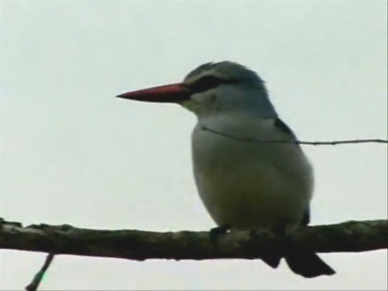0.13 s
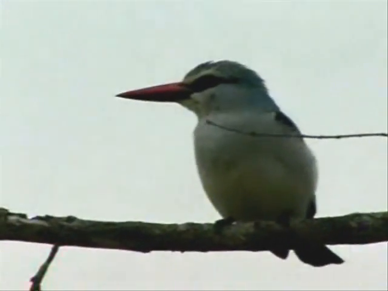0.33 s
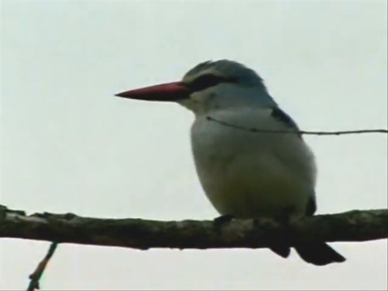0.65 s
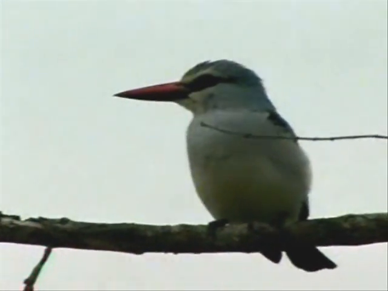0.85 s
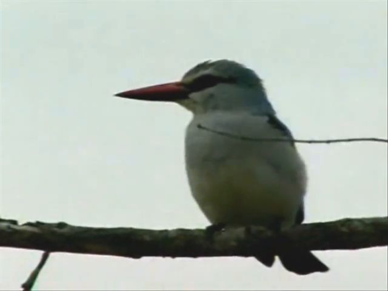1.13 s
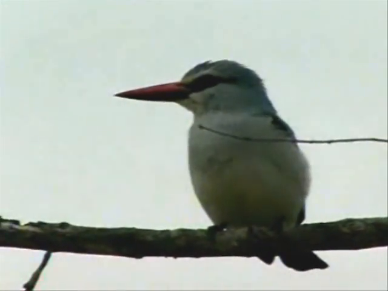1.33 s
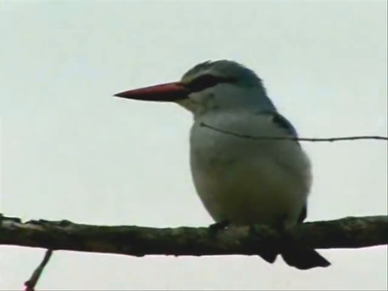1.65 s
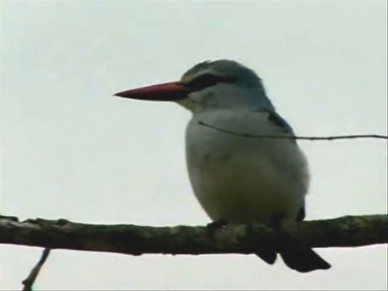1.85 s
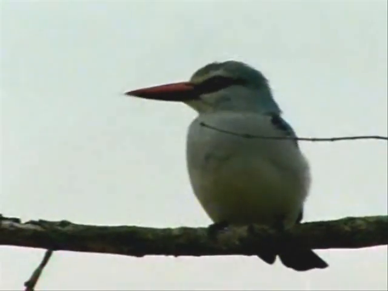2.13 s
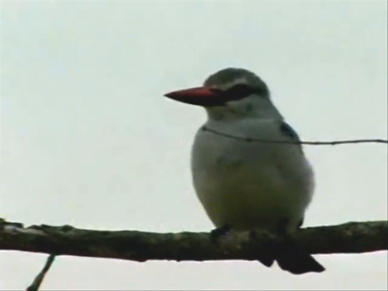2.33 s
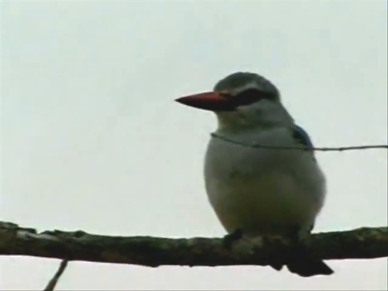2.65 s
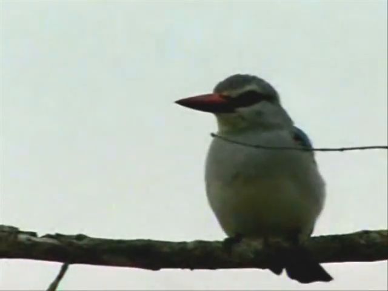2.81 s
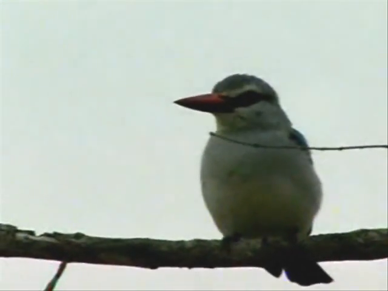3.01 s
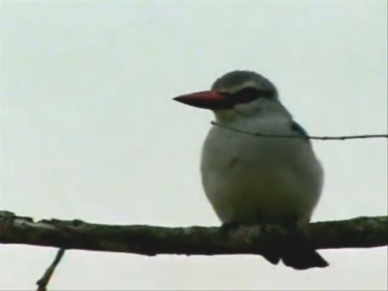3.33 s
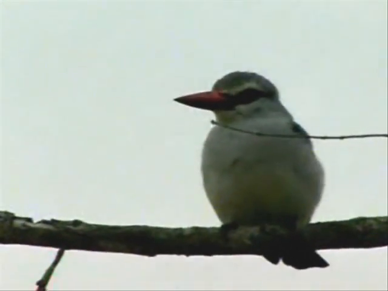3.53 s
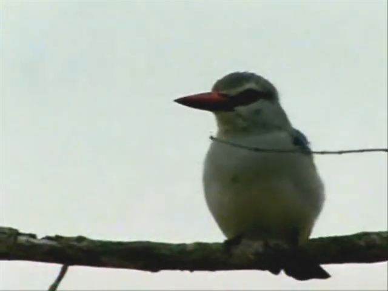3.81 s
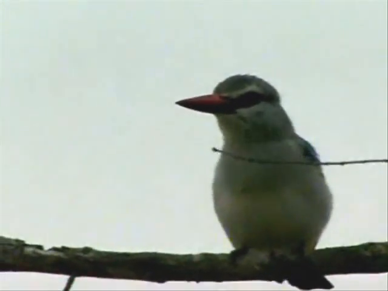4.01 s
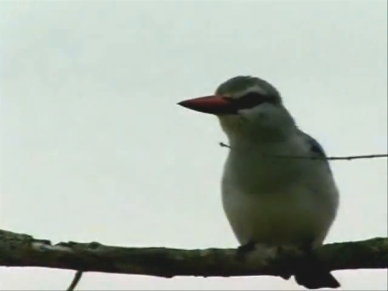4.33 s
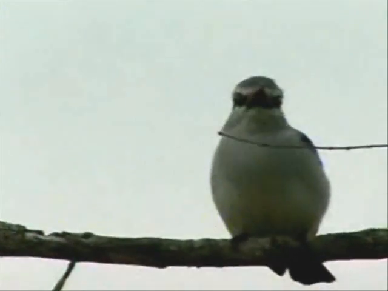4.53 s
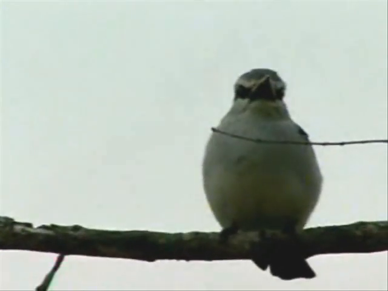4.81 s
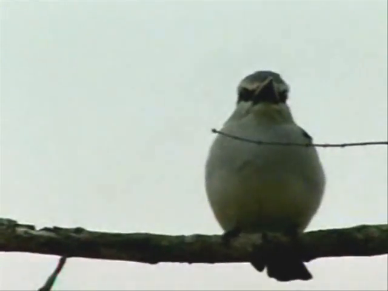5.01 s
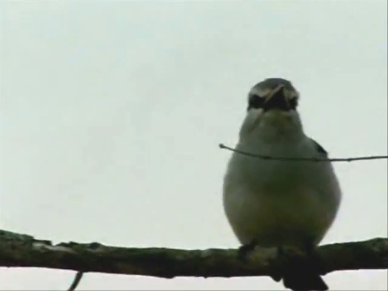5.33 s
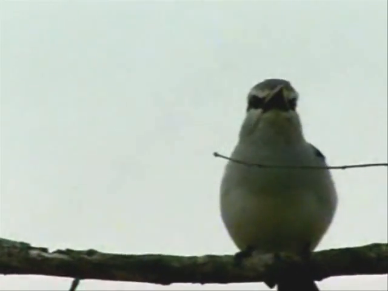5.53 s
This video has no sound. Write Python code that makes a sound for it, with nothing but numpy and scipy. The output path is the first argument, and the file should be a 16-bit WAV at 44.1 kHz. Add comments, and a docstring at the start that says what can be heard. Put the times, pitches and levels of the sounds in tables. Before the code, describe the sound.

A dense, scratchy bird chorus fills the first half, raspy and squeaky, close to the microphone. It breaks off briefly and a fainter, high kingfisher trill of tiny descending notes stands clear. The loud chatter comes back more broken, with regular short honks and sharp whistles, and lasts to the end. Soft leafy noise and rumble lie below, with short outdoor echo; the sound is narrow and muffled on top.

```python
"""Heard first: close birds chattering in open bush; chirps, caws, honks and whistles are gliding sine stacks.
Harsh rasps overlap them: uneven pulses, breath noise and pitch slides ringing throat resonances.
A kingfisher trills farther off in short falling notes, clearest in the pause.
Below lie rumble and leaves as coloured noise, hum tones and hiss.
The sound is nearly mono and dull above 4 kHz."""
import sys
import numpy as np
from scipy import signal
from scipy.fft import rfft, irfft, next_fast_len
from scipy.io import wavfile
from scipy.ndimage import uniform_filter1d

SR = 44100
rng = np.random.default_rng(int(sys.argv[2]) if len(sys.argv) > 2 else 0)


def unload_wav(signal):
    """Save mono or channel-first audio to the path in sys.argv[1] as 16-bit WAV at rate SR, clipped to [-1, 1]."""
    wavfile.write(
        sys.argv[1],
        SR,
        np.round(np.clip(np.atleast_2d(signal).T, -1, 1) * 32767).astype(np.int16),
    )


N = 250047

# Background noise spectrum: f/Hz, relative density/dB
BUSH_SPECTRUM = [(20, -6), (60, -17.5), (110, -16.5), (220, -3), (400, -11.5), (700, -9.5), (1000, -11),
                 (1400, -17), (2000, -16), (2850, -12.5), (3600, -18.5), (5000, -34)]
# Hum tones, mains and one higher: f/Hz, mean level/dB rms
HUM_TONES = [(50, -58), (150, -64.5), (488, -62)]
# Single far trill notes: t/s, level/dB
TRILL_NOTES = [(2.765, -38), (2.82, -39), (2.833, -36), (2.955, -39), (2.995, -44), (3.085, -46),
               (3.184, -43), (3.244, -35), (3.28, -33), (3.319, -36), (2.882, -35), (2.923, -27),
               (2.94, -33), (2.984, -30), (3.07, -34), (3.144, -27.5), (3.166, -42), (3.031, -41),
               (3.207, -33), (3.226, -45), (3.262, -35), (3.308, -36.5), (3.345, -42)]
# Fast runs of the trill note: start t/s, length/s, mean level/dB
NOTE_RUNS = [(3.385, 0.052, -32.5), (3.59, 0.1, -26), (3.813, 0.21, -26.5), (4.068, 0.18, -21.5),
             (4.285, 0.2, -29), (4.633, 0.098, -21.5), (4.742, 0.18, -23.5), (5, 0.38, -30.5),
             (5.343, 0.19, -35), (5.611, 0.04, -16.5)]
# Rasping syllables: start t/s, length/s, level/dB, upper over lower throat/dB
RASP_SYLLABLES = [(0, 0.052, -29, -6), (0.075, 0.063, -31, -2), (0.129, 0.079, -20, 1),
                  (0.214, 0.056, -27.5, -1), (0.292, 0.038, -23.5, -7.5), (0.393, 0.083, -28, 5.5),
                  (0.535, 0.041, -28, 2), (0.624, 0.019, -26, -1), (0.685, 0.062, -24.5, 2.5),
                  (0.753, 0.1, -23.5, 3), (0.878, 0.054, -24, 1.5), (0.953, 0.059, -31.5, -10),
                  (1.041, 0.088, -27, 1.5), (1.121, 0.076, -27, 0), (1.216, 0.099, -33, -4),
                  (1.317, 0.072, -28.5, -4), (1.413, 0.069, -32, 0.5), (1.494, 0.049, -28.5, -2),
                  (1.545, 0.09, -27, 0), (1.666, 0.07, -27, -1), (1.758, 0.059, -23, 1.5),
                  (1.832, 0.052, -23.5, -1), (1.914, 0.06, -24.5, 3), (2.001, 0.065, -24.5, 2),
                  (2.098, 0.14, -23, 1.5), (2.212, 0.071, -25, 4), (2.302, 0.13, -31, -3),
                  (2.463, 0.037, -33, 7), (2.497, 0.11, -26, 0), (2.645, 0.083, -30.5, 4),
                  (2.73, 0.088, -42, -7), (3.368, 0.028, -30.5, -10), (3.43, 0.061, -40, 7),
                  (3.47, 0.032, -24, 13), (3.526, 0.026, -43, 7.5), (3.588, 0.083, -25.5, -2),
                  (3.66, 0.064, -26, 18), (3.701, 0.053, -23.5, 4), (3.796, 0.14, -27.5, -4),
                  (3.881, 0.038, -16, 8.5), (3.947, 0.05, -20.5, -6.5), (3.99, 0.038, -30, -5.5),
                  (4.02, 0.03, -37, -0.5), (4.034, 0.1, -25, 3.5), (4.144, 0.042, -30, 15),
                  (4.183, 0.054, -24, -2), (4.248, 0.048, -27, -6), (4.286, 0.015, -25.5, -7),
                  (4.295, 0.054, -28.5, -2), (4.382, 0.033, -33.5, 11), (4.42, 0.032, -23.5, 6.5),
                  (4.44, 0.026, -21, 2.5), (4.518, 0.1, -29, 0), (4.617, 0.037, -24, -5),
                  (4.677, 0.027, -18.5, 13), (4.734, 0.19, -26.5, -20.5), (4.876, 0.067, -39, 3),
                  (4.907, 0.062, -30, -10.5), (4.975, 0.069, -25.5, -16), (5.067, 0.059, -25.5, -4),
                  (5.151, 0.16, -27.5, -6), (5.228, 0.083, -37, 4), (5.333, 0.049, -25, 0),
                  (5.384, 0.058, -27, -1), (5.481, 0.072, -29, -7), (5.551, 0.18, -28.5, -6)]
# Stresses inside the rasps: centre t/s, level/dB
RASP_STRESSES = [(.021, -17.5), (.039, -26), (0.151, -11.5), (0.178, -10), (0.254, -37), (.311, -28),
                 (0.325, -25), (.422, -28.5), (0.444, -16.5), (0.547, -17.5), (0.58, -16.5), (.657, -21),
                 (.806, -17.5), (0.914, -14), (0.997, -25.5), (1.083, -13.5), (1.118, -22.5),
                 (1.183, -13.5), (1.259, -16.5), (1.35, -15.5), (1.371, -18), (1.574, -18.5),
                 (1.617, -15.5), (1.746, -13), (1.796, -17.5), (1.876, -14), (1.941, -10), (1.96, -9),
                 (2.02, -22.5), (2.055, -13.5), (2.128, -14), (2.146, -12), (2.218, -18), (2.532, -9),
                 (2.673, -17), (3.386, -30), (3.403, -32.5), (3.487, -24), (3.501, -20), (3.517, -20),
                 (3.644, -20.5), (3.722, -19.5), (3.743, -15), (3.758, -21.5), (3.823, -17.5),
                 (3.928, -24.5), (3.947, -17), (4.09, -34), (4.137, -14), (4.294, -28), (4.315, -18),
                 (4.359, -26), (4.38, -22), (4.408, -13.5), (4.471, -20.5), (4.544, -30.5), (4.566, -25),
                 (4.63, -22), (4.7, -14), (4.717, -12), (4.941, -29), (4.958, -33), (4.998, -19),
                 (5.152, -27.5), (5.227, -18), (5.655, -14.5)]
# Throat resonances: f/Hz, one-pass width/Hz, level/dB
LOWER_RESONANCES = [(814, 240, -6.5), (1102, 160, -5), (1767, 570, 4), (2335, 1130, 2.5)]
UPPER_RESONANCES = [(2893, 510, 1), (3448, 413, -1), (4240, 340, 4), (4600, 130, -3.8)]
# Three-harmonic chirps; the third follows the octave: t/s, start f/Hz, fundamental level/dB, octave level/dB
CHIRP_NOTES = [(0.119, 1603, -20, -23), (0.184, 1532, -20.5, -10), (0.405, 1635, -26.5, -27),
               (.7, 1770, -28, -23), (0.718, 1606, -18, -13.5), (0.763, 1611, -49, -21.5),
               (0.78, 1568, -19, -19), (.836, 1820, -25.5, -21.5), (0.859, 1555, -40.5, -24),
               (0.963, 1622, -31, -24), (0.98, 1553, -25.5, -12), (1.23, 1656, -28.5, -23.5),
               (1.245, 1573, -26, -11), (1.558, 1600, -21.5, -9.5), (1.728, 1690, -25.5, -28),
               (1.927, 1703, -26, -26.5), (1.95, 1760, -36, -14), (2.111, 1657, -29.5, -16),
               (2.251, 1783, -39, -26), (2.519, 1590, -31, -8), (2.689, 1806, -33, -19),
               (2.703, 1785, -28.5, -20.5), (3.495, 1706, -27.5, -19), (3.601, 1570, -23, -20),
               (3.717, 1576, -33, -18.5), (3.875, 1578, -20, -14.5), (4.112, 1585, -18.5, -13),
               (4.383, 1565, -26.5, -13.5), (4.728, 1574, -23.5, -27), (4.785, 1513, -32, -26),
               (4.798, 1493, -32, -25.5), (4.924, 1716, -28.5, -21.5), (4.979, 1582, -21, -13.5),
               (5.135, 1791, -24.5, -17.5), (5.207, 1804, -23.5, -17), (5.275, 1535, -28, -16.5),
               (5.285, 1512, -36, -18), (5.615, 1524, -24.5, -6.5)]
# Caws, falling harmonic stacks: t/s, length/s, start f/Hz, level near 2.1 kHz/dB, level near 3 kHz/dB
CAW_NOTES = [(.004, 0.0024, 1018, -21.5, -7.5), (0.208, 0.037, 1157, -27, -26.5),
             (0.25, 0.017, 952, -19, -28), (0.418, 0.007, 1060, -20, -16), (0.533, 0.013, 1164, -26, -21.5),
             (0.855, 0.01, 1070, -24, -19), (1.063, 0.046, 1176, -25.5, -22),
             (1.135, 0.027, 1235, -36, -31), (1.265, 0.024, 1100, -28.5, -38),
             (1.435, 0.024, 1094, -29, -30), (1.584, 0.024, 1050, -30, -19.5),
             (1.633, 0.014, 1007, -30, -38), (1.793, 0.037, 1081, -18.5, -20),
             (1.848, 0.01, 1181, -24.5, -10.5), (1.959, 0.047, 1148, -27, -30.5),
             (2.008, 0.023, 1180, -27, -21.5), (2.127, 0.04, 1135, -22, -20), (2.19, 0.018, 1066, -27, -13),
             (2.312, 0.035, 1092, -29.5, -32), (2.385, 0.022, 1114, -29.5, -24.5),
             (2.489, 0.04, 1146, -32, -27), (2.671, 0.0084, 1078, -26, -17), (3.58, 0.021, 1083, -33, -31),
             (3.639, 0.016, 1231, -23, -18), (4.071, 0.026, 996, -26.5, -25),
             (4.198, 0.015, 1108, -19.5, -29), (4.222, 0.0085, 988, -20, -20),
             (4.315, 0.025, 1063, -25.5, -23.5), (4.57, 0.012, 974, -25.5, -25),
             (4.87, 0.011, 1023, -26, -30), (5.003, 0.027, 1069, -20.5, -25.5),
             (5.057, 0.022, 1170, -28.5, -25.5), (5.175, 0.047, 1165, -24.5, -25.5),
             (5.333, 0.0079, 1174, -14.5, -23.5), (5.5, 0.01, 1150, -27.5, -27),
             (5.631, 0.011, 1068, -19, -29)]
# Anchors of the caw spectrum: f/Hz
CAW_ANCHORS_HZ = [1100, 2100, 3050, 4000]
# Honks, lower stacks: t/s, start f/Hz, end f/Hz, levels near 2.5, 3 and 3.5 kHz/dB
HONK_NOTES = [(3.435, 519, 495, -23.5, -20, -30), (3.661, 499, 454, -28, -20.5, -28),
              (3.9, 498.4, 482, -19.5, -12, -25.5), (4.138, 501, 476, -37, -23, -29.5),
              (4.4, 487.3, 487, -34.5, -21.5, -24), (4.644, 482, 493.6, -22.5, -14, -21),
              (4.876, 467.4, 479, -28.5, -21.5, -29.5)]
# Anchors of the honk spectrum: f/Hz
HONK_ANCHORS_HZ = [1000, 1900, 2450, 2950, 3450, 4200]
# One-partial glides, mostly whistles; the rows at 4.879 and 4.899 s are extra rising partials of the honk
# there: t/s, length/s, start f/Hz, end f/Hz, level/dB
WHISTLE_NOTES = [(0.0, 0.012, 2050, 2030, -19.5), (0.0, 0.018, 3070, 2970, -16),
                 (0.021, 0.0086, 3320, 3430, -21), (0.025, 0.016, 3715, 3766, -24),
                 (0.099, 0.035, 2830, 2600, -26.5), (0.138, 0.025, 1983, 2110, -20.5),
                 (0.139, 0.013, 3060, 3070, -20.5), (0.145, 0.025, 3470, 3314, -16.5),
                 (0.155, 0.015, 3050, 3040, -9), (0.157, 0.017, 2400, 2600, -14),
                 (0.17, 0.0079, 1930, 2080, -22), (0.171, 0.013, 3330, 3390, -32),
                 (0.2, 0.0092, 2590, 2410, -24), (0.204, 0.015, 2380, 2380, -25),
                 (0.24, 0.035, 3240, 3520, -26.5), (0.252, 0.021, 2810, 2704, -25),
                 (0.292, 0.022, 2160, 2220, -28), (0.294, 0.03, 3440, 3430, -31),
                 (0.339, .01, 825, 780, -35), (0.378, .012, 2690, 2620, -28),
                 (0.419, 0.019, 3120, 3000, -17), (.44, .022, 3630, 3770, -23),
                 (0.459, .008, 3480, 3300, -21), (0.422, 0.022, 2066, 1940, -21),
                 (0.541, 0.012, 3390, 3300, -25), (0.546, 0.035, 2165, 1960, -25),
                 (0.567, .008, 3470, 3700, -26), (0.574, 0.0084, 3360, 3900, -24),
                 (0.642, 0.021, 1670, 2003, -26), (0.65, 0.012, 3480, 3316, -18.5),
                 (0.745, 0.021, 2340, 3070, -21.5), (0.747, 0.029, 2040, 2620, -21.5),
                 (0.76, 0.018, 3006, 3140, -17), (0.763, 0.016, 2880, 2750, -26),
                 (0.805, 0.021, 3190, 3010, -21.5), (0.809, 0.029, 2080, 2160, -19.5),
                 (0.86, 0.016, 2040, 2050, -29), (0.898, 0.011, 1725, 2010, -25),
                 (0.901, 0.011, 3360, 3464, -23.5), (0.912, 0.011, 2034, 2000, -16.5),
                 (0.91, 0.022, 2800, 2750, -24), (0.966, 0.0073, 3500, 3380, -18),
                 (0.992, 0.012, 3330, 3520, -19), (1.052, 0.02, 2560, 2650, -24.5),
                 (1.072, 0.019, 2370, 2220, -25), (1.075, 0.015, 3460, 3340, -29),
                 (1.081, 0.0096, 1960, 2090, -29), (1.091, 0.033, 2020, 1763, -26.5),
                 (1.097, 0.027, 3330, 3620, -21.5), (1.122, 0.026, 2290, 2250, -32),
                 (1.125, 0.021, 1620, 2070, -26), (1.17, 0.024, 3535, 3330, -23),
                 (1.172, 0.011, 3770, 3780, -21.5), (1.325, 0.023, 2220, 2270, -32),
                 (1.327, 0.023, 3350, 3140, -27), (1.344, 0.01, 1930, 2060, -27),
                 (1.349, 0.014, 2170, 1985, -23), (1.367, 0.008, 3500, 3440, -26),
                 (1.369, 0.022, 1834, 1820, -31), (1.379, 0.011, 3400, 3700, -23),
                 (1.429, 0.012, 2170, 2110, -25.5), (1.455, 0.027, 1920, 1794, -29.5),
                 (1.491, 0.017, 2200, 2100, -34), (1.513, 0.012, 1865, 1920, -25),
                 (1.546, 0.012, 2570, 3100, -28), (1.575, 0.014, 2120, 1930, -21),
                 (1.578, 0.025, 3070, 3000, -26.5), (1.592, 0.012, 2050, 2130, -21),
                 (1.594, 0.02, 2420, 2545, -25.5), (1.609, 0.014, 3465, 3515, -17.5),
                 (1.61, 0.019, 2270, 2105, -18), (1.611, 0.0085, 3120, 3260, -34),
                 (1.633, 0.026, 2840, 2930, -27.5), (1.634, 0.025, 1956, 1906, -21),
                 (1.676, 0.019, 2206, 2240, -23.5), (1.693, 0.018, 1910, 1933, -21),
                 (1.719, .011, 3500, 3350, -10.5), (1.707, .012, 2700, 3310, -25.5),
                 (1.731, 0.022, 3240, 2980, -16.5), (1.782, 0.031, 2356, 1980, -17.5),
                 (1.784, 0.026, 3203, 3050, -17.5), (1.816, 0.018, 2060, 1870, -21.5),
                 (1.846, 0.015, 3440, 3540, -21.5), (1.858, 0.032, 1837, 2080, -27.5),
                 (1.869, 0.0091, 3480, 3580, -15.5), (1.916, 0.011, 2510, 2550, -25),
                 (1.928, 0.039, 3374, 3340, -9), (1.96, 0.024, 2296, 2130, -21.5),
                 (1.981, 0.014, 2840, 3000, -31), (1.977, 0.028, 1950, 1965, -23.5),
                 (2.016, 0.009, 3385, 3530, -17.5), (2.025, 0.012, 3170, 2830, -26),
                 (2.031, 0.01, 2020, 1846, -26), (2.039, 0.02, 3440, 3610, -28),
                 (2.127, 0.013, 3560, 3370, -19), (2.139, 0.024, 3340, 3380, -21),
                 (2.142, 0.012, 2220, 2170, -21), (2.158, 0.027, 3215, 3160, -21),
                 (2.159, 0.02, 1958, 1885, -24.5), (2.175, 0.044, 3230, 2820, -20),
                 (2.187, 0.029, 2140, 1960, -26.5), (2.213, 0.013, 1850, 1860, -29.5),
                 (2.225, 0.016, 2865, 2900, -24), (2.24, 0.026, 3440, 3540, -28),
                 (2.264, 0.015, 2920, 2915, -22.5), (2.314, 0.017, 2270, 2190, -18.5),
                 (2.338, 0.037, 2920, 2930, -27), (2.339, 0.025, 1940, 1930, -25),
                 (2.401, 0.025, 1955, 1925, -25.5), (2.495, 0.011, 2280, 2150, -22.5),
                 (2.505, 0.0098, 2170, 2070, -23), (2.517, 0.017, 1950, 1920, -34),
                 (2.535, 0.028, 3030, 2860, -17), (2.55, 0.013, 2370, 2360, -21),
                 (2.568, 0.012, 3650, 3390, -21.5), (2.573, 0.013, 2010, 1950, -24),
                 (2.662, 0.016, 2290, 2020, -40), (2.664, 0.011, 3250, 3120, -20.5),
                 (2.675, 0.02, 2360, 1910, -26), (2.683, 0.033, 2560, 2740, -27),
                 (2.731, 0.028, 2200, 1610, -30), (3.357, 0.025, 2176, 1815, -36),
                 (3.381, 0.021, 2330, 1840, -37), (3.424, 0.0089, 2940, 1980, -19.5),
                 (3.473, 0.012, 3060, 2800, -24), (3.487, 0.024, 2746, 2610, -24),
                 (3.507, 0.014, 3310, 3430, -21), (3.511, 0.0091, 2640, 2770, -25),
                 (3.582, 0.013, 2140, 2090, -23), (3.612, 0.02, 2050, 2080, -24.5),
                 (3.624, 0.016, 2070, 1890, -27), (3.615, 0.02, 3110, 2940, -21),
                 (3.637, 0.036, 3560, 3640, -20), (3.64, 0.019, 2360, 2460, -26),
                 (3.651, 0.027, 3156, 2910, -17.5), (3.722, 0.012, 2740, 2650, -30),
                 (3.824, 0.01, 2910, 2970, -27), (3.839, 0.016, 3040, 2940, -19.5),
                 (3.857, 0.014, 3020, 2760, -18), (3.944, 0.016, 3000, 2725, -11.5),
                 (3.959, 0.007, 3580, 3060, -16), (3.967, 0.0065, 3580, 3130, -16.5),
                 (3.973, 0.011, 2920, 2080, -22), (3.974, 0.015, 2840, 2720, -31.5),
                 (3.982, 0.012, 3555, 3350, -21.5), (3.983, 0.0091, 3080, 2880, -27),
                 (4.059, 0.012, 2120, 2060, -21.5), (4.066, 0.028, 3160, 2780, -22),
                 (4.081, 0.017, 3530, 3400, -26), (4.09, 0.02, 2980, 2780, -19.5),
                 (4.14, 0.011, 2600, 2390, -15), (4.19, 0.022, 2137, 2144, -20),
                 (4.203, 0.042, 3516, 3450, -23.5), (4.204, 0.0084, 2190, 2140, -20.5),
                 (4.214, 0.025, 1980, 1780, -24), (4.225, 0.017, 2976, 2770, -25),
                 (4.274, 0.017, 1820, 2010, -27), (4.318, 0.024, 3096, 3010, -17.5),
                 (4.335, 0.031, 3065, 2784, -25), (4.378, 0.015, 1980, 2370, -23),
                 (4.398, 0.0083, 3040, 2730, -12), (4.428, 0.022, 2840, 2710, -20),
                 (4.451, .008, 3500, 3060, -16.5), (4.458, 0.007, 2830, 2530, -16),
                 (4.498, 0.017, 2980, 2820, -20), (4.534, 0.01, 2320, 2260, -19.5),
                 (4.543, 0.018, 2200, 1990, -19), (4.56, 0.011, 1910, 1940, -23.5),
                 (4.561, 0.028, 3530, 3580, -28), (4.564, 0.011, 2695, 2990, -16.5),
                 (4.573, 0.016, 2004, 1810, -25), (4.573, 0.024, 3020, 2575, -17.5),
                 (4.593, 0.017, 3020, 2680, -19.5), (4.681, 0.016, 3014, 2615, -14.5),
                 (4.705, 0.017, 2990, 2910, -11.5), (4.71, 0.015, 3273, 3430, -14.5),
                 (4.767, 0.012, 2310, 2450, -13.5), (4.768, 0.015, 2900, 2960, -14.5),
                 (4.793, 0.019, 3060, 3000, -20), (4.794, 0.017, 2126, 2020, -27),
                 (4.806, 0.019, 2997, 2857, -13.5), (4.809, 0.018, 2000, 1880, -24),
                 (4.826, 0.013, 2960, 2785, -17.5), (4.827, 0.0098, 2220, 2120, -18.5),
                 (4.84, 0.027, 2097, 2180, -22), (4.851, 0.011, 2750, 2700, -25),
                 (4.863, 0.019, 3230, 2950, -27), (4.879, 0.021, 2743, 2796, -17.5),
                 (4.899, .028, 3300, 3420, -26.5), (4.938, .009, 3650, 3210, -18),
                 (4.954, 0.0072, 3620, 3240, -22.5), (4.924, 0.023, 2888, 2747, -16.5),
                 (4.939, 0.011, 2970, 2420, -16), (5.004, 0.014, 2943, 3050, -26),
                 (5.008, 0.02, 2200, 2130, -23), (5.022, 0.021, 3455, 3500, -18.5),
                 (5.023, 0.0097, 2130, 1860, -28), (5.025, 0.0079, 2380, 2350, -22),
                 (5.027, 0.022, 2730, 2730, -29), (5.066, 0.021, 2237, 2345, -27),
                 (5.085, 0.025, 1967, 2130, -22), (5.113, 0.025, 2125, 1960, -25.5),
                 (5.131, 0.016, 2530, 2700, -23.5), (5.148, 0.0075, 3330, 3610, -20),
                 (5.222, 0.0089, 3000, 2670, -18), (5.276, 0.024, 2790, 2690, -21),
                 (5.151, 0.024, 3075, 2880, -26), (5.161, 0.015, 2290, 2320, -26),
                 (5.181, 0.034, 2270, 1934, -26.5), (5.196, 0.018, 3120, 2960, -24),
                 (5.234, 0.017, 2310, 2320, -28.5), (5.243, 0.041, 3040, 3050, -28),
                 (5.253, 0.015, 1940, 2110, -20.5), (5.263, 0.012, 2120, 2080, -19.5),
                 (5.332, 0.014, 2770, 2760, -24), (5.414, 0.02, 1920, 2130, -24.5),
                 (5.496, 0.041, 2287, 2050, -30), (5.582, 0.015, 2020, 2066, -23),
                 (5.629, 0.015, 2940, 3150, -15.5), (5.63, 0.022, 2115, 1924, -23),
                 (5.645, 0.015, 2954, 2650, -12.5), (5.653, 0.013, 3280, 3680, -23),
                 (5.651, 0.057, 2380, 2515, -10.5)]
# Level over time of the calls' treble, about 3.8 to 4.85 kHz: t/s, level/dB
TREBLE_LEVEL = [(0, 2), (.5, -5), (.68, 4), (.78, -12.5), (.9, 2.5), (1.5, 3), (1.85, -0.5), (1.95, 2.5),
                (2.3, -1), (2.4, -5), (2.55, 3), (3.4, -8), (3.8, 5), (3.93, -5.5), (4.0, -17), (4.12, -3),
                (4.25, -5), (4.4, -4.5), (4.74, -0.5), (4.79, -27.5), (5.55, -27.5), (5.62, 1.5)]

BUSH_DB, RUMBLE_HZ, RUMBLE_SWAY_DB = -39.5, 400, 1.5   # the rumble sways below RUMBLE_HZ

TRILL_S, TRILL_FROM_HZ, TRILL_TO_HZ = .013, 3306, 2713.2
TRILL_TAIL_S, TRILL_TAIL_FALL, TRILL_TAIL_DB = 0.011, .04, -8   # fall: share of end pitch
RUN_GAP_S, RUN_UNEVEN, RUN_DETUNE, RUN_SPREAD_DB = .017, .2, .03, 2.5   # uneven: share of gap
FAR_SLIDES_DB = -46.5

RASP_PULSE_HZ, RASP_JITTER, RASP_BREATH = 480, .12, .22   # mean rate; relative spread; noise gain
RASP_SLIDE_GAIN = 1.4   # slides against pulses and breath
RASP_ATTACK_S, RASP_RELEASE_S, RASP_THROB_DB = 0.012, 0.0084, 1.5
STRESS_S, STRESS_OPEN_DB = 0.0036, 7.5   # Gaussian sigma; upper over lower resonances

NOTE_LEAD_S, NOTE_EDGE_S = .0015, .002   # early start of all notes; extra margin
NOTE_ROUNDNESS, NOTE_PEAK_EXPONENT = .75, 0.99   # small is square; above 1 peaks late
NOTE_WAVER, NOTE_FLUTTER_DB, NOTE_FLUTTER_HZ = .004, 1.8, 150
CHIRP_S, CHIRP_FALL, CHIRP_THIRD_DB = 0.019, 0.046, -15   # fall: share of pitch; third against octave
CAW_FALL_PER_S, CAW_TOP_DB = 4.1, -16.5   # share of pitch per s; top against 3 kHz level
CAW_LOW_DB, CAW_LOW_FOLLOWS = -32, 0.088   # low anchor: offset + share of the 2.1 kHz level
HONK_S = .05
HONK_LOW_DB, HONK_MID_DB, HONK_TOP_DB = -38.5, -34, -24.5   # first two anchors; top against 3.5 kHz

ECHO_DB, FAR_ECHO_DB, ECHO_T60_S = -10, -10.5, 0.14
SIDE_DB, SIDE_VOICE_DB = -21, -31.5
OVERLOAD, SKEW = .42, 0.033   # tanh ceiling; square-law gain
MIC_EDGE_HZ, TREBLE_TOP_HZ, CUTOFF_HZ = 3732, 4850, 11000
TREBLE_DB, TREBLE_REF_RMS = -20, 0.11   # treble gain where body rms = reference and TREBLE_LEVEL = 0 dB
HISS_INPUT_DB, HISS_SIDE = -66, .12   # before band-pass; side against mid


def from_db(db):
    """Decibels to gain."""
    return 10 ** (np.asarray(db) / 20)


def rms_one(x):
    """Scale to rms 1."""
    return x / np.sqrt(np.mean(x ** 2) + 1e-20)


def drift(rate_hz):
    """Two-pole low-passed noise, rms 1."""
    r = np.exp(-2 * np.pi * rate_hz / SR)
    noise = rng.standard_normal(N + 8000)
    return rms_one(signal.lfilter([1], [1, -2 * r, r * r], noise)[8000:])


def resonate(x, modes):
    """Parallel resonances of alternating sign, each passed twice for steep skirts; rms 1."""
    out = 0
    for k, (hz, width_hz, level_db) in enumerate(modes):
        r = np.exp(-np.pi * width_hz / SR)
        b = (1 - r * r) / 2 * np.array([1, 0, -1])
        a = [1, -2 * r * np.cos(2 * np.pi * hz / SR), r * r]
        ringing = signal.lfilter(b, a, signal.lfilter(b, a, x))
        out = out + (-1) ** k * from_db(level_db) * ringing
    return rms_one(out)


def add_note(out, start_s, length_s, from_hz, to_hz, partials, waver, flutter):
    """Add one geometric glide; partials are (multiple, level/dB), with pitch waver and level flutter."""
    first, size = round((start_s - NOTE_LEAD_S) * SR), round(length_s * SR)
    part = slice(max(first, 0), min(first + size, N))
    u = (np.arange(part.start, part.stop) - first) / size
    pitch_hz = from_hz * (to_hz / from_hz) ** u * waver[part]
    phase = 2 * np.pi * np.cumsum(pitch_hz) / SR
    shape = np.sin(np.pi * u ** NOTE_PEAK_EXPONENT) ** NOTE_ROUNDNESS * flutter[part]
    for multiple, level_db in partials:
        out[part] += from_db(level_db) * shape * np.sin(multiple * phase)


def pitch_slides(per_s, low_hz, high_hz, falling):
    """Random steep slides of about 10 ms; a share `falling` falls; rms 1."""
    out, unvaried = np.zeros(N), np.ones(N)
    for at, pitch, length, slope, way, size in rng.random((round(per_s * N / SR), 6)):
        hz = low_hz * (high_hz / low_hz) ** pitch
        bend = (.05 + .08 * slope) * np.sign(falling - way)
        add_note(out, at * N / SR, .006 + .009 * length, hz * (1 + bend), hz * (1 - bend),
                 [(1, 5 * size)], unvaried, unvaried)
    return rms_one(out)


def bush():
    """Rumble, leaves and far birds as coloured noise, mid and side, plus hum tones."""
    size = next_fast_len(N)
    hz = np.maximum(np.arange(size // 2 + 1) * SR / size, 1)
    knots_hz, knots_db = np.transpose(BUSH_SPECTRUM)
    colour = from_db(np.interp(np.log(hz), np.log(knots_hz), knots_db))
    mid, side = irfft(rfft(rng.standard_normal((2, size))) * colour, size)[:, :N]
    rumble = signal.sosfilt(signal.butter(2, RUMBLE_HZ, fs=SR, output="sos"), mid)
    mid = mid + rumble * (from_db(RUMBLE_SWAY_DB * drift(3.9)) - 1)
    level = from_db(BUSH_DB + 1.1 * drift(6))
    t = np.arange(N) / SR
    tones = sum(from_db(db) * np.sqrt(2) * np.sin(2 * np.pi * tone_hz * t) for tone_hz, db in HUM_TONES)
    hum = from_db(1.6 * drift(3)) * tones
    return level * rms_one(mid) + hum, (level * rms_one(side) + hum * drift(8)) * from_db(SIDE_DB)


def far_trill():
    """Short falling notes with a flatter fading hook, wavering and fluttering, over fainter far slides."""
    out, waver, flutter = np.zeros(N), 1 + 0.0074 * drift(110), from_db(3.0 * drift(120))
    notes = [(s, db, 1) for s, db in TRILL_NOTES]
    for start_s, length_s, db in NOTE_RUNS:
        shift, size, tune = rng.standard_normal((40, 3)).T
        for k in range(round(length_s / RUN_GAP_S)):
            note_s = start_s + RUN_GAP_S * (k + RUN_UNEVEN * shift[k])
            notes.append((note_s, db + RUN_SPREAD_DB * size[k], 1 + RUN_DETUNE * tune[k]))
    for s, level_db, tune in notes:
        end_hz = tune * TRILL_TO_HZ
        add_note(out, s - .002, TRILL_S, tune * TRILL_FROM_HZ, end_hz, [(1, level_db)], waver, flutter)
        add_note(out, s - .004 + TRILL_S, TRILL_TAIL_S, 1.04 * end_hz, (1 - TRILL_TAIL_FALL) * end_hz,
                 [(1, level_db + TRILL_TAIL_DB)], waver, flutter)
    return out + from_db(FAR_SLIDES_DB) * pitch_slides(110, 2200, 3400, falling=.75)


def rasp_source():
    """Uneven syrinx pulses with breath noise and broken pitch slides."""
    rate_hz = RASP_PULSE_HZ * (1 + 0.11 * drift(12) + RASP_JITTER * drift(250))
    pulses = np.diff(np.floor(np.cumsum(rate_hz) / SR), prepend=0)
    pulses = pulses * from_db(1.5 * rng.standard_normal(N))
    voice = rms_one(pulses) + RASP_BREATH * rng.standard_normal(N)
    voice = resonate(voice, [(2300, 5000, 0)])
    return voice + RASP_SLIDE_GAIN * pitch_slides(260, 950, 3750, falling=.7)


def syllable_shape(u_s, length_s):
    """Linear attack and release of a rasp; half level at its nominal end."""
    release = (length_s - u_s) / RASP_RELEASE_S + .5
    return np.clip(np.minimum(u_s / RASP_ATTACK_S, release), 0, 1)


def stress_shape(u_s):
    """Gaussian burst inside a rasp."""
    return np.exp(-.5 * (u_s / STRESS_S) ** 2)


def rasps():
    """The source rings the throat; each syllable sets how open the upper resonances are."""
    source = rasp_source()
    t, lower, upper = np.arange(N) / SR, np.zeros(N), np.zeros(N)
    throb = from_db(RASP_THROB_DB * drift(74))
    events = [(s, db, open_db, lambda u, d=length_s: syllable_shape(u, d))
              for s, length_s, db, open_db in RASP_SYLLABLES]
    events += [(s, db, STRESS_OPEN_DB, stress_shape) for s, db in RASP_STRESSES]
    for s, level_db, open_db, shape in events:
        part = slice(max(round((s - .05) * SR), 0), round((s + .35) * SR))
        power = (from_db(level_db) * shape(t[part] - s) * throb[part]) ** 2
        upper_share = 1 / (1 + from_db(-2 * open_db))
        lower[part] += power * (1 - upper_share)
        upper[part] += power * upper_share
    low_voice = np.sqrt(lower) * resonate(source, LOWER_RESONANCES)
    return low_voice + np.sqrt(upper) * resonate(source, UPPER_RESONANCES)


def add_chirps(out, voice):
    """Short falling notes of three harmonics."""
    for s, hz, low_db, octave_db in CHIRP_NOTES:
        partials = [(1, low_db), (2, octave_db), (3, octave_db + CHIRP_THIRD_DB)]
        add_note(out, s - NOTE_EDGE_S, CHIRP_S + 2 * NOTE_EDGE_S, hz, hz * (1 - CHIRP_FALL), partials, *voice)


def add_stack(out, s, length_s, hz, fall, anchors_hz, anchors_db, voice):
    """Gliding harmonics, levels read off the spectrum anchors at mid-glide."""
    multiples = np.arange(np.ceil(800 / hz), 4500 // hz + 1)
    levels_db = np.interp(multiples * hz * (1 - fall / 2), anchors_hz, anchors_db)
    add_note(out, s - NOTE_EDGE_S, length_s + 2 * NOTE_EDGE_S, hz, hz * (1 - fall),
             zip(multiples, levels_db), *voice)


def add_caws(out, voice):
    """Falling harmonic stacks."""
    for s, length_s, hz, mid_db, high_db in CAW_NOTES:
        low_db = CAW_LOW_DB + CAW_LOW_FOLLOWS * mid_db
        levels_db = [low_db, mid_db, high_db, high_db + CAW_TOP_DB]
        add_stack(out, s, length_s, hz, CAW_FALL_PER_S * length_s, CAW_ANCHORS_HZ, levels_db, voice)


def add_honks(out, voice):
    """Lower harmonic stacks that glide less."""
    for s, hz, end_hz, low_db, mid_db, high_db in HONK_NOTES:
        levels_db = [HONK_LOW_DB, HONK_MID_DB, low_db, mid_db, high_db, high_db + HONK_TOP_DB]
        add_stack(out, s, HONK_S, hz, 1 - end_hz / hz, HONK_ANCHORS_HZ, levels_db, voice)


def add_whistles(out, voice):
    """Single gliding sines."""
    for s, length_s, from_hz, to_hz, level_db in WHISTLE_NOTES:
        add_note(out, s - NOTE_EDGE_S, length_s + 2 * NOTE_EDGE_S, from_hz, to_hz, [(1, level_db)], *voice)


def tonal_calls():
    """Tonal voices share one waver and flutter; chirps and honks get less of both."""
    out = np.zeros(N)
    waver, flutter = 1 + NOTE_WAVER * drift(150), from_db(NOTE_FLUTTER_DB * drift(NOTE_FLUTTER_HZ))
    rough, smoother = (waver, flutter), (waver ** .4, flutter ** .4)
    add_chirps(out, smoother)
    add_caws(out, rough)
    add_honks(out, smoother)
    add_whistles(out, rough)
    return out


def echoes(x, rows):
    """Scatter from trunks and ground: convolution with short decaying noise of unit energy."""
    t = np.arange(SR // 2) / SR
    tail = rng.standard_normal((rows, len(t))) * from_db(-60 * t / ECHO_T60_S) * (t > .004)
    tail /= np.sqrt(np.sum(tail ** 2, axis=1, keepdims=True))
    return signal.fftconvolve(x[None], tail, axes=1)[:, :N]


def scene():
    """Background, far trill and near birds with echo, mid/side to left/right."""
    mid, side = bush()
    far = far_trill()
    near = rasps() + tonal_calls()
    wet, spread = echoes(from_db(ECHO_DB) * near + from_db(FAR_ECHO_DB) * far, rows=2)
    mid = mid + near + far + wet
    side = side + from_db(SIDE_VOICE_DB) * (spread / from_db(ECHO_DB) + near * drift(40))
    return np.array([mid + side, mid - side])


def record(dry):
    """Soft clipping, a steep edge with weak varying treble above it, square-law overtones and hiss."""
    rounded = OVERLOAD * np.tanh(dry / OVERLOAD)
    body = signal.sosfilt(signal.ellip(8, .5, 60, MIC_EDGE_HZ, fs=SR, output="sos"), rounded)
    edges_hz = [MIC_EDGE_HZ * 1.01, TREBLE_TOP_HZ]
    treble = signal.sosfilt(signal.butter(4, edges_hz, "band", fs=SR, output="sos"), rounded)
    loudness = np.sqrt(np.maximum(uniform_filter1d(body ** 2, size=1500), 0))
    treble = treble * (loudness / TREBLE_REF_RMS) ** 1.6   # shows mainly on loud calls
    treble = treble * from_db(np.interp(np.arange(N) / SR, *np.transpose(TREBLE_LEVEL)))
    overtone_band = signal.butter(4, [4600, 6800], "band", fs=SR, output="sos")
    overtones = signal.sosfilt(overtone_band, SKEW * body ** 2)
    hiss_band = signal.butter(4, [4300, 10800], "band", fs=SR, output="sos")
    hiss = signal.sosfilt(hiss_band, rng.standard_normal((2, N)))
    hiss = hiss[0] + HISS_SIDE * hiss[1] * [[1], [-1]]
    heard = body + from_db(TREBLE_DB) * treble + overtones + from_db(HISS_INPUT_DB) * hiss
    return signal.sosfilt(signal.cheby2(12, 70, CUTOFF_HZ, fs=SR, output="sos"), heard)


dry = scene()
out = record(dry)
unload_wav(out)
```